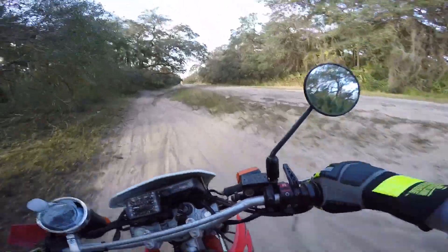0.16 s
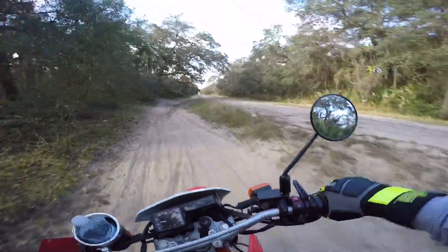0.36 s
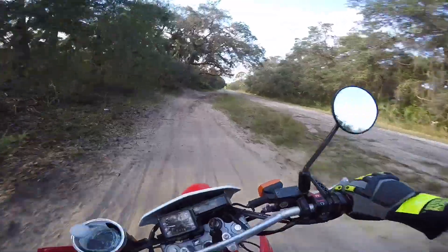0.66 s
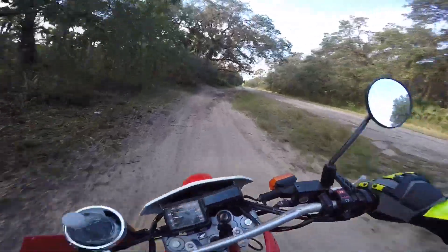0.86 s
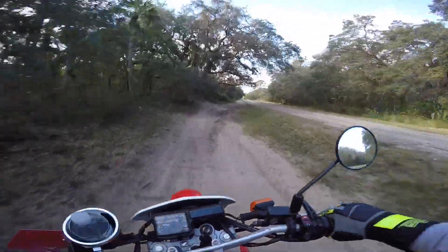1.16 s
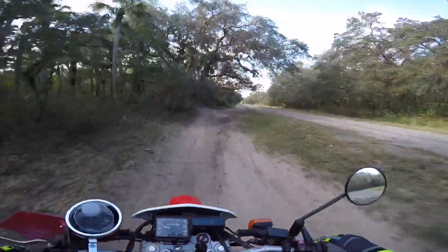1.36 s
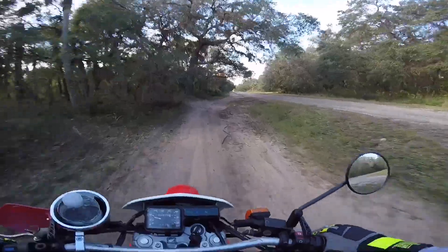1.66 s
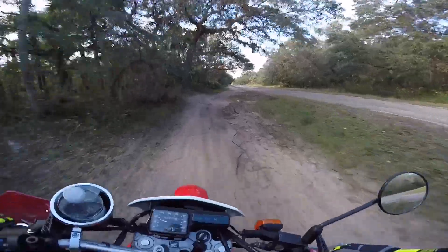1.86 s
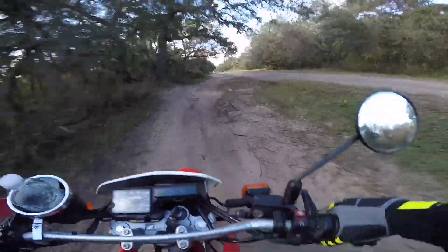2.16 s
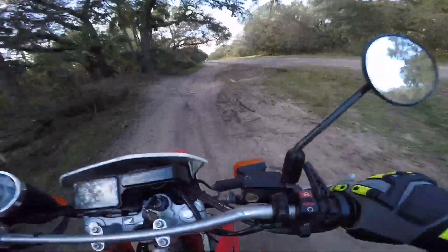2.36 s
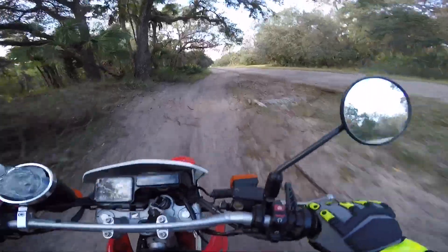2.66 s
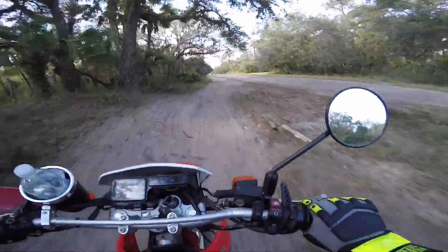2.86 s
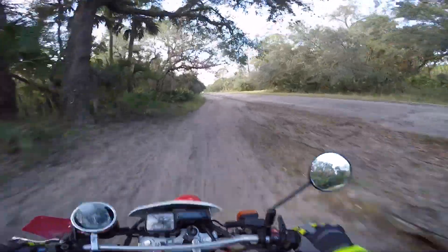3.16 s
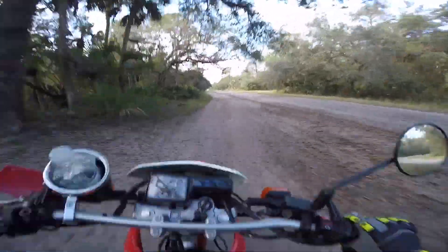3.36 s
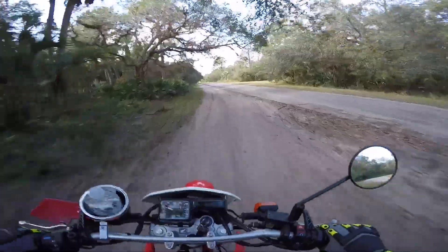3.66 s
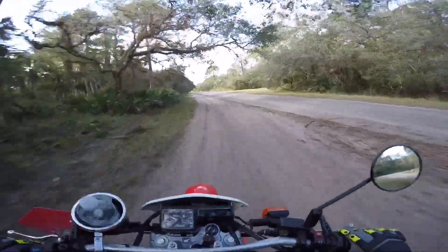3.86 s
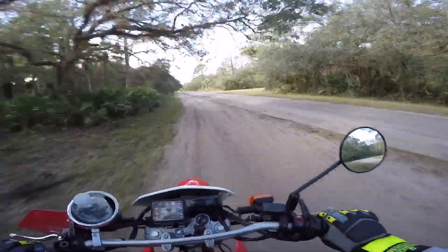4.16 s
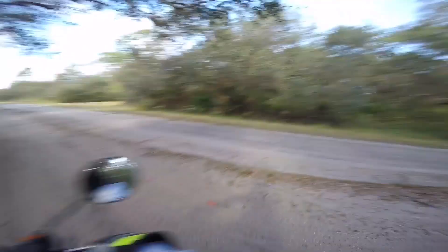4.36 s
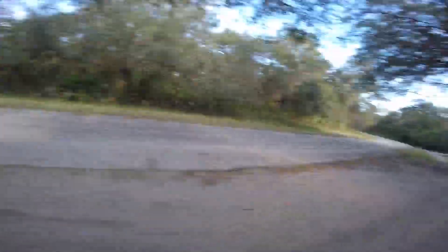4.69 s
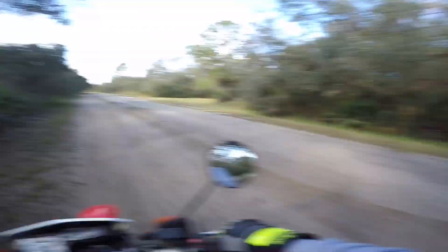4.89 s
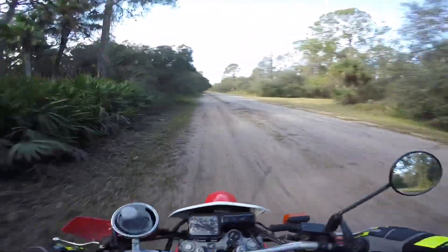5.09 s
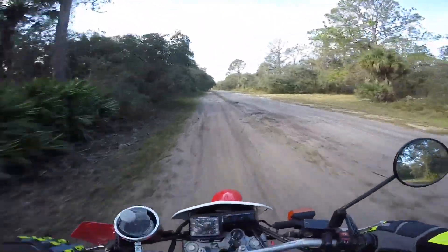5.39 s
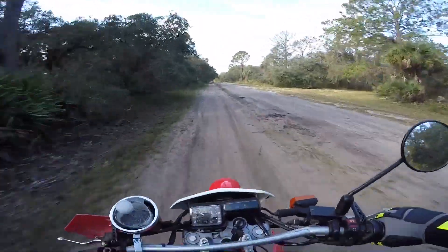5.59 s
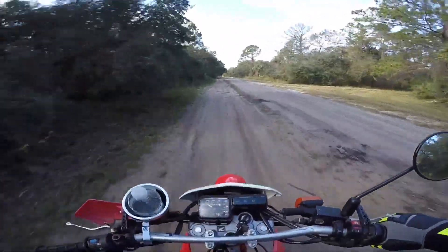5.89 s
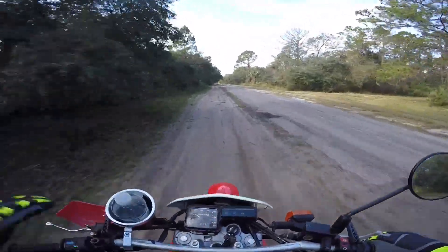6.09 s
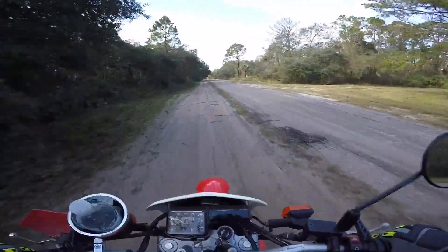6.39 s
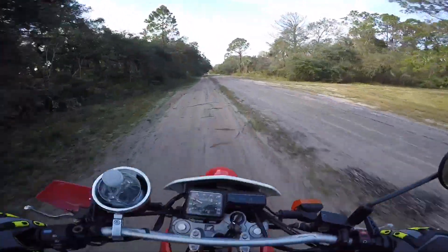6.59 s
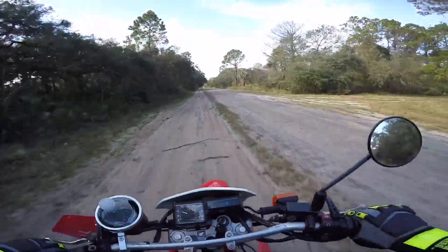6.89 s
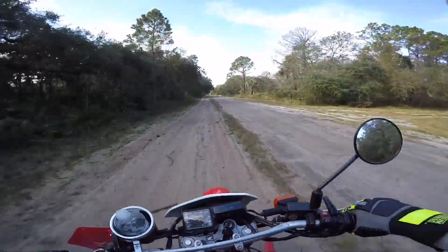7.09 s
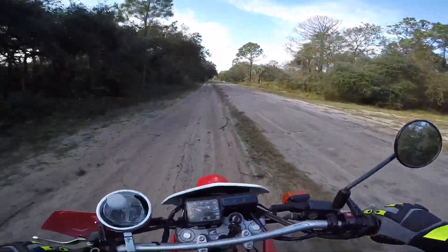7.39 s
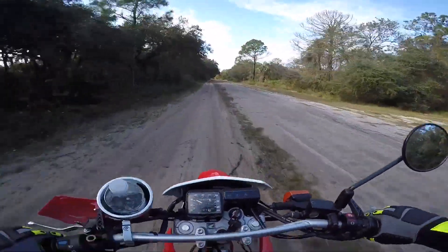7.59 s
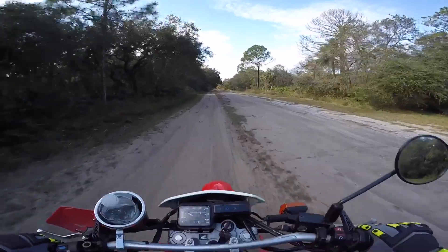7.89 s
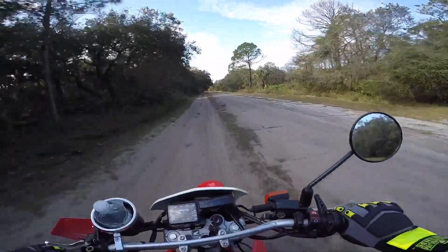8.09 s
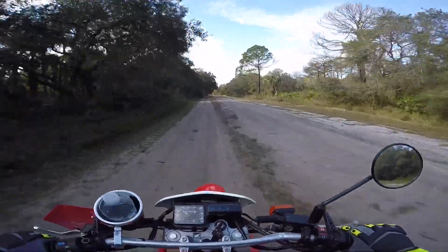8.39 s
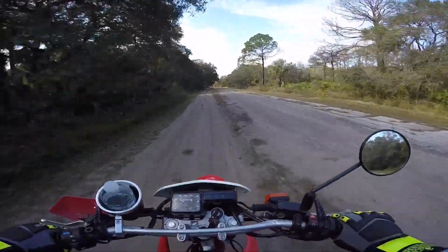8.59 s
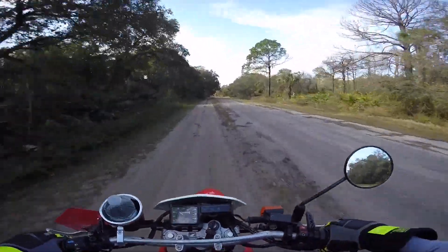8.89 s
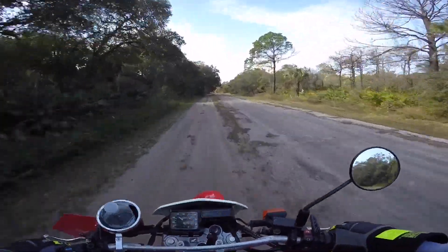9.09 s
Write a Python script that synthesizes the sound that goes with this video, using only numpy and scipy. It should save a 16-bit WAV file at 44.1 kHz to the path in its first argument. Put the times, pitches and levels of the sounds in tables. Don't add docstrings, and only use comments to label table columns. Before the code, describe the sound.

A single-cylinder dirt bike revs in throaty bursts along a sandy trail, coasts, takes a hard knock on the helmet microphone, then accelerates again.

```python
import sys
import numpy as np
from scipy import signal
from scipy.fft import rfft, irfft
from scipy.io import wavfile
from scipy.ndimage import uniform_filter1d

SR = 44100
rng = np.random.default_rng(int(sys.argv[2]) if len(sys.argv) > 2 else 0)


def amp(db):
    return 10 ** (np.asarray(db, float) / 20)


def write(x):
    x = np.atleast_2d(x).T
    wavfile.write(sys.argv[1], SR, np.round(np.clip(x, -1, 1) * 32767).astype(np.int16))


N = 407925
T = np.arange(N) / SR
SINCE_KNOCK = T - 5.87
SHUT_DB = -33


def level(x, db):
    return x * amp(db) / np.sqrt(np.mean(x ** 2))


def ring(x, hz, width_hz):
    return signal.lfilter(*signal.iirpeak(hz, hz / width_hz, SR), x)


def colour(x, points):
    hz, db = np.transpose(points)
    bins_hz = np.arange(N // 2 + 1) * SR / N
    return irfft(rfft(x) * amp(np.interp(np.log(bins_hz + 1), np.log(hz), db)), N)


def walk(rate):
    k = int(SR / rate)
    steps = np.repeat(rng.standard_normal(N // k + 1), k)
    return 1.6 * uniform_filter1d(uniform_filter1d(steps, k), k)[:N]


def clicks(at, size):
    at = np.clip(at, 0, N - 2)
    whole = at.astype(int)
    early = np.bincount(whole, size * (1 + whole - at), N)
    late = np.bincount(whole + 1, size * (at - whole), N)
    return early + late


def beats(cycles, count, jitter_ms, scatter_db):
    chance = rng.standard_normal((60 * count * N // SR, 2))
    marks = np.arange(int(cycles[-1] * count))
    at = np.interp(marks / count, cycles, np.arange(N)) + jitter_ms * chance[marks, 0] * SR / 1000
    return clicks(at, amp(scatter_db * chance[marks, 1]))


def curves(rows):
    s, *columns = np.transpose(rows)
    return (np.interp(T, s, c) for c in columns)


def lag(x, seconds):
    keep = np.exp(-1 / (seconds * SR))
    return signal.lfilter([(1 - keep) ** 2], [1, -2 * keep, keep ** 2], x)


def resonate(drive, modes, tilt_db=0):
    uneven_db = 1.4
    rings = []
    for hz, width_hz, size, ms in modes:
        gain = size * amp(hz / 1000 * (uneven_db * walk(15) + tilt_db))
        steep = ring(ring(drive, hz, 1.99 * width_hz), hz, 1.99 * width_hz)
        rings.append(gain * np.roll(steep, int(ms * SR / 1000)))
    return sum(rings) / max(np.std(r) for r in rings)


# (t/s, f/Hz)
WHEEL_RATE = [(0.0, 37.5), (0.36, 36.1), (0.74, 41.77), (1.03, 43.96), (1.75, 44.55), (2.45, 32.13),
              (3.05, 34.76), (3.75, 54.37), (3.95, 45.89), (4.19, 48.14), (4.43, 41.23), (4.67, 43.33),
              (6.16, 35.81), (6.86, 43.27), (7.81, 39.83), (8.36, 45.16), (8.61, 45.97), (9.25, 44.88)]
# (from t/s, to t/s, exhaust level/dB, wheel slip f/Hz, bark over exhaust level/dB)
GRIP = [(0.0, 0.093, -18, 3, -3.5), (0.199, 0.37, -18, 5, -3.5), (0.52, 0.71, -16.5, 5.5, -7),
        (0.788, 1.046, -16, 5, -7.5), (1.19, 1.366, -15.5, 4.5, -6), (2.283, 2.395, -16, 0.63, -4.5),
        (2.396, 2.498, -21.5, -1.06, -0.5), (2.503, 2.981, -15, 2, -4), (3.103, 3.264, -13.5, 0.67, -3),
        (3.26, 3.409, -16.5, -7.5, -5.5), (3.408, 3.755, -16, -3, -3), (3.755, 4.221, -15, 0.47, -5.5),
        (6.284, 6.404, -26, 0.86, 3.5), (6.401, 6.541, -29, -2.5, 1), (6.543, 7.056, -16.5, -0.22, -5),
        (7.047, 7.327, -26, -1.63, -40), (7.34, 7.516, -15, 3.5, -4), (7.643, 8.69, -15.5, 6.5, -4.5)]
# (t/s, change of firing rate f/Hz, half length t/s)
WHEEL_RUTS = [(0.174, -0.41, .03), (0.318, 0.62, 0.0483), (0.562, 0.54, 0.027), (0.682, 0.59, 0.03036),
              (0.845, -0.75, 0.069), (1.01, 1.03, 0.04067), (1.199, -.7, 0.04026), (1.318, 0.64, 0.0407),
              (1.542, 0.55, .04), (1.666, -0.74, 0.0616), (1.869, 0.58, .03), (2.168, -0.92, 0.03957),
              (2.477, -0.45, .03), (2.644, 0.65, 0.03996), (2.807, -0.53, .04), (2.936, 0.66, 0.0487),
              (3.083, 0.73, .03), (3.172, 1.13, 0.0389), (3.333, -0.44, .04), (3.426, 0.64, .03),
              (3.52, 0.99, 0.03027), (3.678, 0.66, 0.0705), (4.171, 0.7, 0.0622), (4.356, 0.63, 0.0531),
              (4.547, 0.51, .03), (4.691, -0.541, .05), (5.329, .5, 0.0673), (5.654, 0.39, .05),
              (5.979, -0.49, 0.0819), (6.369, 0.65, .03), (6.481, -0.92, .03), (6.594, 0.81, .04),
              (7.043, -0.52, .03), (7.407, 0.84, .04), (7.577, -1.28, .03), (7.681, 0.4, .03),
              (7.989, -0.89, .08), (8.478, -0.76, 0.023), (8.796, -.6, .07)]


def throttle():
    bark_shut_db, bark_opening_db = -13, 6
    slip_lag_s, twist_s = .05, 0.053
    slip, open_db, bark_db = np.zeros((3, N))
    for start, end, db, hz, share_db in GRIP:
        held = (T >= start) & (T < end)
        slip = slip + hz * held
        open_db = open_db + (db - SHUT_DB) * held
        bark_db = bark_db + (share_db - bark_shut_db) * held
    size = int(twist_s * SR)
    open_db, bark_db = (uniform_filter1d(uniform_filter1d(x, size), size) for x in (open_db, bark_db))
    load = np.clip(open_db / 18, 0, 1)
    opening = np.maximum(load - lag(load, 0.3), 0)
    bark_db = bark_shut_db + bark_db + bark_opening_db * opening
    coarse = T[::50]
    ruts = sum(hz * np.exp(-.5 * ((coarse - s) / half) ** 2) for s, hz, half in WHEEL_RUTS)
    hz = np.interp(T, coarse, ruts) + next(curves(WHEEL_RATE)) + lag(slip, slip_lag_s)
    return hz, SHUT_DB + open_db, bark_db, load


# (t/s, lead t/ms)
CHAIN_SLACK = [(0, 4.5), (.28, 2.8), (.65, 2.3), (.92, .9), (1.28, -.5), (2.33, -4.9), (2.6, -2),
               (2.9, -2.5), (3.17, -4.8), (3.5, -2.2), (3.7, -3.9), (4.15, -5.7), (6.6, -10.5), (6.8, -8.7),
               (7.42, -8), (7.9, -4.3), (8.3, -5.2), (8.6, -4.8)]


def engine_cycles(hz):
    return np.cumsum(hz) / SR + .3 + hz * lag(next(curves(CHAIN_SLACK)), .02) / 1000


# (f/Hz, width f/Hz, signed size, arrival after the firing t/ms)
BOOM_MODES = [
    (45, 110, 0.11, 3.1),
    (109.3, 26.7, 0.64, 11),
    (254.6, 46.2, 0.69, 15),
    (342.4, 33.3, -0.66, 14.25),
]
# (f/Hz, width f/Hz, signed size, arrival after the firing t/ms)
BARK_MODES = [
    (564, 59.6, -0.98, 5.1),
    (725.5, 59.5, 0.82, 6.517),
    (1162, 222, -0.096, 8.2),
    (2010, 440, -0.0011, 24),
]


def intake_dip(cycles, slow_hz):
    valve = beats(cycles + .008 * slow_hz, count=1, jitter_ms=.15, scatter_db=1.5)
    dip = np.convolve(valve, signal.windows.gaussian(401, 1.1 * SR / 1000), "same")
    dip = dip - .8 * np.roll(dip, int(4.9 * SR / 1000))
    return level(dip - dip.mean(), 0) * amp(-9 + .55 * slow_hz)


def exhaust(hz, cycles, bark_db):
    clock = np.cumsum((hz / 44) ** .08)
    clock = clock * (N - 1) / clock[-1]
    cycles = np.interp(np.arange(N), clock, cycles)
    pipe_hz = np.interp(np.arange(N), clock, hz)
    fire = beats(cycles, count=1, jitter_ms=.08, scatter_db=.9)
    gulp = beats(cycles + .52, count=1, jitter_ms=0.11, scatter_db=1.5)
    fire = level(fire - fire.mean(), 0) + level(gulp - gulp.mean(), -17)
    puff = level(np.exp(-(cycles % 1) / 2.1) * rng.standard_normal(N), 0)
    tilt_db = 0.54 * (pipe_hz - 44)
    dip = intake_dip(cycles, 48 - pipe_hz)
    swell = [(f, width_hz, size, -ms) for f, width_hz, size, ms in BOOM_MODES]
    boom = resonate((fire + amp(-23) * puff)[::-1], swell)[::-1]
    bark = resonate(fire + amp(-20) * puff, BARK_MODES, tilt_db)
    boom, bark = (np.interp(clock, np.arange(N), x) for x in (boom + dip, bark))
    return boom + amp(bark_db - 2.5) * bark


def air_box(cycles):
    return ring(np.sin(2 * np.pi * (6 * cycles + 0.16)), 292, 110)


def crank(cycles, hz):
    turn = 4 * np.pi * cycles + 1.2 + .17 * np.maximum(45 - hz, 0) + .12 * walk(25)
    return np.sqrt(2) * amp(1.8 * walk(30)) * (np.sin(turn) + .08 * np.sin(2 * turn + .5))


def piston_shake(cycles):
    return ring(np.sin(8 * np.pi * cycles + 1.7), 152, 63)


# (f/Hz, width f/Hz, level/dB)
COVERS = [
    (151.9, 24, 7),
    (302, 110, -2.5),
    (566, 115, -3),
    (920, 220, -20.5),
    (1975, 150, -26.5),
]
# (multiple of the firing rate, level/dB)
TOOTH_LINES = [(12, -10), (13, -16), (14, -4), (15, -15), (16, -5), (17, -13), (18, -12)]


def clatter(cycles):
    taps = beats(cycles, count=2, jitter_ms=.06, scatter_db=1.5)
    taps = taps + .4 * beats(cycles, count=1, jitter_ms=.06, scatter_db=2)
    rattle = level(taps - taps.mean(), 0) + amp(-14) * rng.standard_normal(N)
    cases = np.zeros(N)
    for hz, width_hz, db in COVERS:
        cases += amp(db + .9 * walk(6)) * ring(ring(rattle, hz, 1.5 * width_hz), hz, 1.5 * width_hz)
    whine = sum(amp(db + 2 * walk(5)) * np.sin(2 * np.pi * k * cycles) for k, db in TOOTH_LINES)
    return level(cases, 0) + amp(2) * ring(ring(whine, 650, 230), 650, 230)


COAST_MULTIPLES = [3, 6, 8, 13, 14, 15, 16, 17, 43, 44, 45, 46, 47, 48]
# (level/dB, level once the knock has turned the case/dB)
COAST_LEVELS = [(-32, -28), (-37, -42), (-44, -42), (-38, -41), (-30, -35), (-37, -47), (-33, -49),
                (-35, -50), (-66, -53), (-62, -50), (-60, -53), (-55, -62), (-52, -66), (-54, -66)]


def overrun(cycles, muffle_db):
    sway = .08 * walk(10)
    song = np.zeros(N)
    for k, (db, after_db) in zip(COAST_MULTIPLES, COAST_LEVELS):
        line_db = np.where(SINCE_KNOCK > 0, after_db, db) + muffle_db * min(k / 12, 1) + .9 * walk(5)
        song += amp(line_db) * np.sin(2 * np.pi * k * cycles + sway)
    return song


# (t/s, signed size 0-1, ring f/Hz, t60/s, crack level/dB)
BLOWS = [(2.288, 0.05, 425, 0.035, -34.5), (2.333, -.1, 332, 0.03, -33), (5.629, 0.2, 304, 0.031, -20),
         (5.634, .1, 657, 0.045, -26.5), (5.638, -.3, 88.6, 0.031, -23.5), (5.641, 0.12, 860, 0.017, -28),
         (5.846, 0.1, 199.1, 0.025, -11.5), (5.847, .12, 813, 0.01, -20.5), (5.851, 0.2, 45, 0.038, -33),
         (5.8612, 0.86, 291, 0.011, -14.5), (5.864, 0.2, 547, 0.015, -17), (5.866, -1.0, 154, 0.02, -21.5),
         (5.868, -.1, 143, 0.036, -2), (5.8709, -.8, 180.5, 0.024, -27.5)]


def knocks():
    thud, crack, t = np.zeros(N + SR), np.zeros(N + SR), np.arange(SR // 4) / SR
    for s, size, hz, t60, crack_db in BLOWS:
        at = slice(int(s * SR), int(s * SR) + len(t))
        thud[at] += size * np.sin(2 * np.pi * hz * t) * 1000 ** (-t / t60)
        crack[at] += amp(crack_db) * np.exp(-t / .002) * rng.standard_normal(len(t))
    thud = thud[:N] * np.exp(-np.maximum(T - 5.878, 0) / .004)
    return thud, ring(ring(crack[:N], 1600, 2000), 1300, 2400)


# (t/s, peak level/dB, share below 5 kHz level/dB)
MOUNT_TICKS = [(0.2823, -52, 2), (0.625, -50.5, 2), (0.8959, -57, 8.5), (0.9178, -59.5, 7),
               (0.9592, -57, 15), (1.2526, -53, 5.5), (1.279, -55.5, 9), (2.5561, -51, -1),
               (2.5795, -45.5, -9.5), (2.6658, -52, 5), (2.7227, -52.5, -2), (3.1438, -53, 1.5),
               (3.2001, -55.5, 4.5), (3.2874, -52, 3.5), (3.3667, -54, 1.5), (3.6336, -51, 3),
               (3.7883, -42, -12), (3.8282, -51.5, -6), (3.8477, -44.5, -9), (3.9489, -51.5, -5),
               (4.0617, -44.5, -11.5), (4.0831, -45, -7), (4.125, -48.5, 2.5), (5.8456, -39, 4),
               (6.7037, -52.5, 1.5), (6.765, -51.5, 3.5), (6.9386, -48, -5.5), (6.9546, -49, -8.5),
               (6.997, -53.5, 0), (7.3881, -45.5, -1), (7.441, -49, 3), (7.4584, -46.5, -0.5),
               (7.4854, -54, -3), (7.7707, -50.5, -6), (7.7897, -44.5, -3.5), (7.9613, -55, 0),
               (7.9867, -57.5, -3.5), (8.0042, -51, 1.5), (8.0306, -43.5, -2), (8.0925, -48, -6),
               (8.1693, -49.5, -2.5), (8.2352, -53.5, 5), (8.2701, -53, 6), (8.329, -47.5, -5),
               (8.3679, -53.5, -0.5), (8.3913, -52, -5.5), (8.4402, -53.5, 3), (8.4642, -47.5, -5.5),
               (8.4881, -53.5, 4.5), (8.5031, -43.5, -7), (8.5749, -49, -6), (8.6178, -56, 7.5),
               (8.6313, -51, -3), (8.6502, -54.5, 6), (8.6867, -54, -7), (5.8675, -37, -5)]


def ticks(load_db):
    s, db, low_db = np.transpose(MOUNT_TICKS)
    snap = np.arange(300) / 15.0 * np.exp(-np.arange(300) / 22.0)
    place, size = rng.random((160, 2)).T
    faint = clicks(place * N, amp(-44.5 - 3.6 * np.log(np.maximum(size, .03))))
    faint = faint * amp(1.11 * load_db + 6.5) * duck() ** 2
    bright = clicks(s * SR, amp(np.minimum(db, -40))) + faint
    dull = clicks(s * SR, amp(db + low_db)) + 1.7 * faint
    bright, dull = (np.convolve(x, snap)[:N] * rng.standard_normal(N) for x in (bright, dull))
    return amp(6.5) * ring(ring(bright, 7400, 8400), 7400, 8400) + amp(15.5) * ring(dull, 2600, 2400)


# (t/s, peak level/dB)
BUCKLE = [(0.181, -43), (1.1124, -45), (1.299, -40), (1.6102, -51.5), (2.0866, -41), (3.2487, -47),
          (3.6498, -39), (3.69, -43.5), (3.904, -38), (4.3047, -45.5), (4.348, -47), (5.7638, -50),
          (6.4752, -48), (7.1904, -49.5), (7.5487, -49), (8.0723, -41.5), (8.1931, -37.5), (8.4488, -44.5)]


def rattles():
    s, db = np.transpose(BUCKLE)
    snap = np.exp(-np.arange(400) / 140.0)
    burst = np.convolve(clicks(s * SR, amp(db)), snap)[:N] * rng.standard_normal(N)
    return amp(7.0) * ring(ring(burst, 3600, 3200), 3600, 3200)


# (f/Hz, level per Hz/dB)
RUSH_SPECTRUM = [(200, 17.5), (650, 21.5), (860, 14.5), (1300, 4.5), (1700, -0.5), (1980, 3.5),
                 (2250, -7.5), (2950, -11.5), (3450, -11), (3800, -8), (5000, -21), (6000, -24.5),
                 (10300, -36.5), (14500, -62.5)]
# (f/Hz, width f/Hz, level/dB)
SHELL_MODES = [
    (2030, 20, -3),
    (3457, 92, 4.5),
    (4970, 440, 5),
]


def rush(cycles, sizzle_db):
    throb = 1.1 + np.exp(-((2 * cycles - .5) % 1) / 0.5)
    noise = level(colour(throb * rng.standard_normal(N), RUSH_SPECTRUM), 20.58)
    noise = noise + sum(amp(db + 1.3 * walk(5)) * ring(noise, hz, w) for hz, w, db in SHELL_MODES)
    top = signal.lfilter(*signal.butter(3, 2700, "high", fs=SR), noise)
    body = signal.lfilter(*signal.butter(3, 2700, fs=SR), noise)
    return amp(.8 * walk(12)) * body + amp(.8 * walk(12) + sizzle_db + 9.0) * top


# (t/s, level/dB)
AIR_FLOW = [(0.0, -33), (0.5, -32), (1.3, -32), (1.55, -31.5), (1.9, -30.5), (2.3, -33), (2.75, -34),
            (3.2, -31.5), (4.2, -30), (4.7, -33.5), (4.95, -30.5), (5.6, -28.5), (6.1, -35.5), (6.5, -32),
            (7.25, -28), (7.7, -28.5), (8.6, -25.5), (9.0, -28)]


def gusts():
    return next(curves(AIR_FLOW))


# (f/Hz, level per Hz/dB)
BUFFET_SPECTRUM = [(8, -19), (22, -5), (45, -4), (90, -11.5), (160, -17), (260, -24), (500, -30),
                   (1200, -63), (4000, -130)]


def wind():
    eddies = level(colour(rng.standard_normal(N), BUFFET_SPECTRUM), 0)
    swell = np.sqrt(uniform_filter1d(eddies ** 2, size=3500))
    return level(amp(.7 * walk(14)) * eddies / swell ** .6, 13.7)


# (f/Hz, width f/Hz, added share)
SEAT_MODES = [
    (205, 100, 0.67),
    (470, 387, -0.52),
    (860, 2000, -0.11),
]


def reseat(ride):
    return ride + (SINCE_KNOCK > 0) * sum(share * ring(ride, hz, w) for hz, w, share in SEAT_MODES)


def muffle():
    return -12.5 * (SINCE_KNOCK > 0) * np.clip(1 - SINCE_KNOCK / 1, 0, 1)


def glance():
    return -2.5 * np.exp(-.5 * ((T - 4.48) / 0.14) ** 2)


def duck():
    since = T - 5.861
    return amp(-8 * (since > 0) * np.exp(-np.maximum(since - .03, 0) / 0.077))


def gain_db(hz, load):
    knock = -16.5 * (SINCE_KNOCK > 0) * np.exp(-np.maximum(SINCE_KNOCK, 0) / 0.3)
    squeeze = -6.5 * lag(load * (hz / 46) ** 0.79, 0.24)
    return 2 + squeeze + knock, -20 - 0.079 * squeeze


def scene():
    hz, pipe_db, bark_db, load = throttle()
    cycles = engine_cycles(hz)
    gust_db, muffle_db, glance_db = gusts(), muffle(), glance()
    turned = SINCE_KNOCK > 0

    crank_db = -29 + 9.5 * load ** 0.16
    gear_db = -30.5 + 5 * load + 0.5 * turned + muffle_db + glance_db
    shake_db = -27 - 0.54 * muffle_db - 2.1 * load + 1.9 * walk(11.0)
    engine = amp(pipe_db) * exhaust(hz, cycles, bark_db)
    engine = engine + amp(pipe_db - 8.5) * air_box(cycles)
    engine = engine + amp(crank_db) * crank(cycles, hz)
    engine = engine + amp(shake_db) * piston_shake(cycles)
    engine = engine + amp(gear_db) * clatter(cycles)
    engine = engine + amp(glance_db) * (1 - load) * overrun(cycles, muffle_db)
    engine = signal.lfilter(*signal.butter(3, 2600, fs=SR), engine)

    rush_db = -44.5 + 1.5 * load + 0.85 * (gust_db + 31) + 0.1 * muffle_db + glance_db
    sizzle_db = -17.5 + 3.5 * load - 4 * turned
    wind_db = gust_db - 6 * load
    ride = -engine + amp(rush_db) * rush(cycles, sizzle_db) + amp(wind_db) * wind()
    ride = reseat(ride)

    right_db, left_db = gain_db(hz, load)
    thud, crack = knocks()
    solid = np.where(T > 5.863, 1.6, .2) * thud
    keep = np.exp(-2 * np.pi * 146 / SR)
    left = signal.lfilter([1 - keep], [1, -keep], ride * amp(left_db) + solid)
    right = ride * amp(right_db) * duck() + ticks(pipe_db + right_db - 15.0) + rattles()
    right = right + 4.5 * thud + crack
    return np.array([left, right])


def roll_off(x):
    return signal.sosfilt(signal.butter(12, 15800, fs=SR, output="sos"), x)


def record(dry):
    soft = dry / (1 + np.abs(dry / 0.99) ** 6) ** (1 / 6)
    hiss = amp(-74.5) * rng.standard_normal(dry.shape) * np.array([[1], [.3]])
    hiss = signal.lfilter(*signal.butter(10, 12600, fs=SR), hiss)
    return roll_off(soft + hiss)


dry = scene()
out = record(dry)
write(out)
```